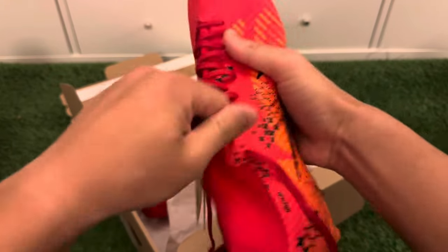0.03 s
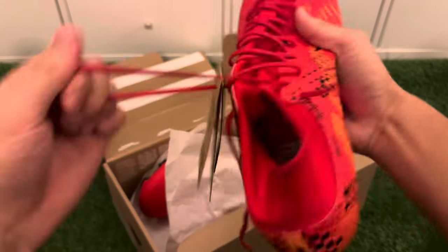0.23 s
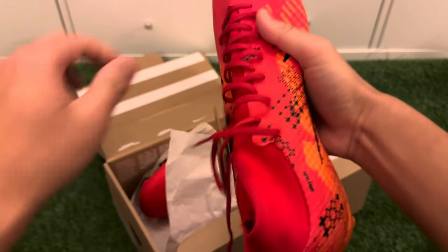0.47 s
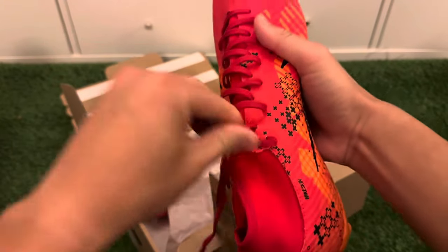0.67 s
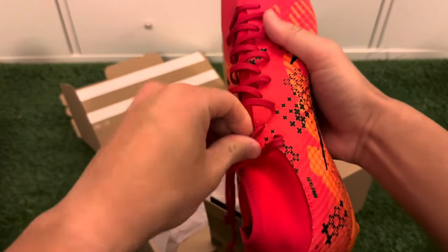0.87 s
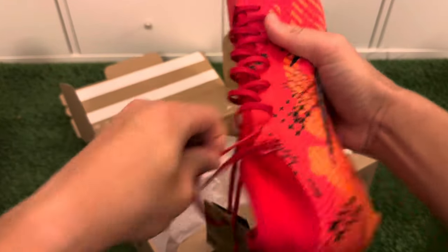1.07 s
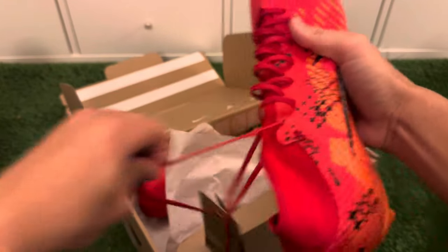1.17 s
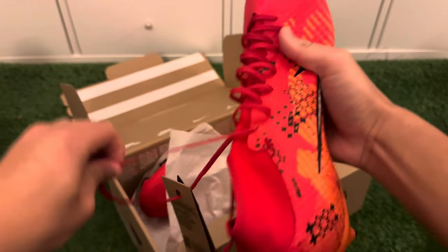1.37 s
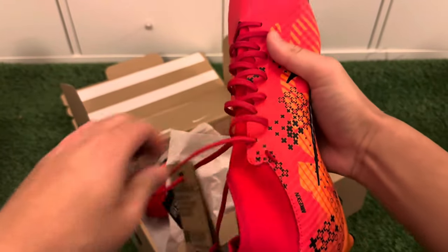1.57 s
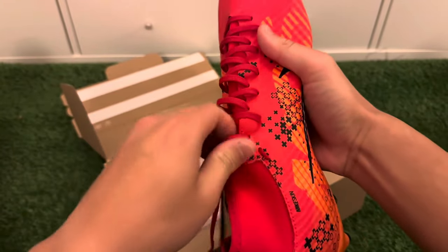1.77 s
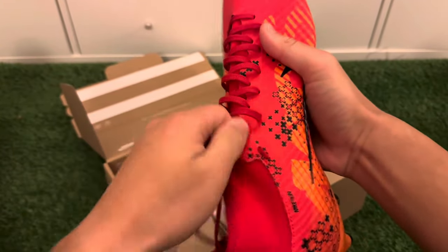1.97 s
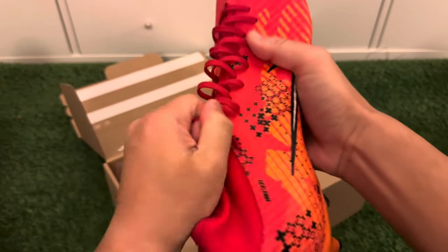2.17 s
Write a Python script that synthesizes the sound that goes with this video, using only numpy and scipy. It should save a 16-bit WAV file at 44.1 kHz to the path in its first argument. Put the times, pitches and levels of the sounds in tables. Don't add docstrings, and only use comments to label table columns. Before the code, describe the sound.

Laces zip through a football boot's eyelets. A sharp tip tick at 0.02 s leads into a fast, rising ribbed zip from 0.07 to 0.2 s, ending in a hollow thump. Small ticks, creaks and thumps follow, clearer near 0.62 s. A second, lower zip runs 1.01 to 1.19 s, with the loudest snap at 1.14. Then softer knocks, creaks and rustle, notably 1.25, 1.7-1.9 and 2.1 s. Close phone, quiet room.

```python
import sys
import numpy as np
from scipy import signal
from scipy.fft import rfft, irfft, next_fast_len
from scipy.io import wavfile

SR = 44100
rng = np.random.default_rng(int(sys.argv[2]) if len(sys.argv) > 2 else 0)


def gain_from_decibels(decibels):
    exponent = np.asarray(decibels, float) / 20
    return 10 ** exponent


def store_wav(level_fs):
    pcm = np.round(np.clip(np.atleast_2d(level_fs), -1, 1) * 32767)
    wavfile.write(sys.argv[1], SR, pcm.T.astype(np.int16))


N = 97152

# pitch_hz, width_hz, level_db
BOOT_LOW = [(97, 29.4, -1.5), (204.3, 78, -0.5), (304.3, 88, 0.5), (512, 167, -6.5)]
# pitch_hz, width_hz, level_db
BOOT_HIGH = [(720, 301, -9.5), (1000, 131, -5), (1190, 244, -12), (1556, 195, -9.5), (2010, 254, -12),
             (2650, 625, -18), (3740, 1300, -25.5), (4300, 200, -23.5), (4795, 680, -34)]


def curve(rows, off=None):
    s, *columns = np.transpose(rows)
    return [np.interp(np.arange(N) / SR, s, column, off, off) for column in columns]


def at_hz(points, hz):
    p = np.array(points)
    return np.interp(np.log(hz + 1), np.log(p[:, 0]), p[:, 1])


def unit(x):
    return x / np.sqrt(np.mean(x ** 2) + 1e-20)


def colour(x, points):
    return irfft(rfft(x) * gain_from_decibels(at_hz(points, np.fft.rfftfreq(N, 1 / SR))), N)


def drift(rate_hz):
    r = np.exp(-2 * np.pi * rate_hz / SR)
    wander = signal.lfilter([1], [1, -2 * r, r * r], rng.standard_normal(N + SR))
    return unit(wander[SR:])


def body(x, peaks):
    out = 0
    for k, (hz, width_hz, db) in enumerate(peaks):
        r = np.exp(-np.pi * width_hz / SR)
        push = np.array([1, 0, -1]) * (1 - r * r) / 2
        ring = [1, -2 * r * np.cos(2 * np.pi * hz / SR), r * r]
        out = out + (-1) ** k * gain_from_decibels(db) * signal.lfilter(push, ring, x + 1e-18)
    return out


def grains(per_s, spread_db):
    hits = rng.random(N) < per_s / SR
    size = gain_from_decibels(spread_db * np.minimum(rng.exponential(1, N), 4))
    return hits * size * rng.choice([-1, 1], N)


def pulls():
    # start_s, ribs_per_s_hz, level_db, hiss_db, octave_db
    pull_tables = [
        [(.074, 265.8, -49, -63, -12), (.084, 301, -49.5, -61.5, -6), (.108, 579.7, -40, -56, -7),
         (.117, 720, -40, -50, 5), (.128, 747, -41.5, -55, 9.5), (.137, 1000, -38.5, -49, -8),
         (.165, 1357, -40.5, -48.5, 2), (.185, 896, -37, -52.5, -16), (.215, 560, -57, -62, -22)],
        [(1.008, 254.5, -57, -78, -11), (1.03, 330.3, -50, -64, 12.5), (1.05, 528.7, -42.5, -55, -18),
         (1.085, 477.8, -42, -59, -10), (1.102, 527, -39.5, -57, -0.5), (1.12, 562.6, -38.5, -54.5, -18),
         (1.138, 622, -44, -57, -17), (1.166, 649, -41, -58, -18), (1.19, 453, -65, -87, -23)],
    ]
    # pitch_hz, level_db (per Hz)
    zip_colour = [(2000, -11), (5000, -13.5), (7000, -10.5), (8500, -4.5), (10000, -2), (12500, -2),
                  (15000, -7.5)]
    rib_jitter, rib_uneven_db = 0.04, 5
    out, wobble, uneven = np.zeros(N), drift(120), rng.standard_normal(N)
    friction_peaks = [(284, 79, -3), (517, 105, -4.5)] + BOOT_HIGH
    friction = unit(body(grains(6000, 0.37), friction_peaks))
    hiss = unit(colour(rng.standard_normal(N), zip_colour)) * gain_from_decibels(drift(58))
    for rows in pull_tables:
        hz = curve(rows)[0]
        level_db, hiss_db, octave_db = curve(rows, -150)[1:]
        turns = np.cumsum(hz * (1 + rib_jitter * wobble)) / SR
        clicks = np.diff(np.floor(turns), prepend=0) * gain_from_decibels(rib_uneven_db * uneven) * np.sqrt(SR / hz)
        buzz = unit(body(clicks, BOOT_HIGH))
        tone = gain_from_decibels(1.5 + 3.3 * drift(86)) * np.sin(2 * np.pi * turns)
        octave = gain_from_decibels(-2 + octave_db + 2.8 * drift(51)) * np.sin(4 * np.pi * turns)
        out += gain_from_decibels(level_db) * (gain_from_decibels(-17) * buzz + tone + octave + gain_from_decibels(1.5) * friction)
        out += gain_from_decibels(hiss_db + 6.5) * hiss
    return out


def snaps():
    # start_s, peak_db, centre_hz
    snap_events = [
        (0.02, -31.5, 4630),
        (.025, -38.5, 4500),
        (0.4142, -41.5, 4500),
        (.4365, -42, 5000),
        (0.621, -35, 4000),
        (1.1444, -16.5, 2700),
        (1.2537, -54.5, 2500),
        (1.912, -38, 4470),
    ]
    fade_s, half_width_octaves = 0.005, 0.9
    out, t = np.zeros(N + SR), np.arange(1024) / SR
    for s, db, hz in snap_events:
        edges_hz = [hz / 2 ** half_width_octaves, hz * 2 ** half_width_octaves]
        band = signal.butter(1, edges_hz, "band", fs=SR, output="sos")
        burst = (rng.standard_normal(1024) + 2.43 * (t == 0)) * gain_from_decibels(-60 * t / fade_s)
        one = signal.sosfilt(band, burst)
        i = int(s * SR)
        out[i:i + 1024] += gain_from_decibels(db) * one / np.abs(one).max()
    return out[:N]


def ticks():
    # start_s, peak_db, sizzle_db, ring_hz
    tick_events = [(0.0212, -25, -46, 2260), (0.283, -67, 18, 5000), (0.384, -60, 17, 5040),
                   (0.496, -48, -4, 2800), (0.416, -44.5, -23, 4070), (0.4364, -36, -8, 5140),
                   (0.453, -45.5, 6.5, 6500), (0.6208, -32.5, -7, 2140), (0.638, -51, 15.5, 5500),
                   (0.744, -57, 7, 5500), (0.789, -48.5, 3, 1970), (0.796, -66, 6, 2500),
                   (.858, -62, 7, 5000), (0.918, -72, 7, 4940), (0.939, -52, 6.5, 5800),
                   (.945, -47.5, -20, 3950), (1.1441, -21.5, -26, 1820), (1.254, -47, -2.5, 4030),
                   (1.312, -57.5, 13, 3120), (1.503, -60, 7, 3900), (1.7095, -54.5, 7, 3180),
                   (1.748, -43, -14, 2830), (1.853, -49, -5, 3960), (1.9123, -36, 1.5, 4570),
                   (2.1263, -54, 12.5, 3330)]
    crack_fade_s, sizzle_fade_s = 0.012, 0.055
    ring_db, ring_cycles, rise_s = -1, 9.8, 0.00049
    out, t = np.zeros((2, N + SR)), np.arange(2048) / SR
    top = signal.butter(2, 6500, "high", fs=SR, output="sos")
    for s, db, sizzle_db, hz in tick_events:
        shared, fizz, left, right = rng.standard_normal((4, 2048))
        hit = shared + 1.9 * (t == 0) + 0.62 * np.array([left, right])
        hit = hit * gain_from_decibels(-60 * t / crack_fade_s)
        ring = np.sin(2 * np.pi * hz * t) * (1 - np.exp(-hz * t)) * gain_from_decibels(-60 * hz * t / ring_cycles)
        crack = unit(body(hit, BOOT_HIGH) + gain_from_decibels(-42) * hit) + gain_from_decibels(ring_db) * unit(ring)
        sizzle = signal.sosfilt(top, fizz * gain_from_decibels(-60 * t / sizzle_fade_s))
        one = crack / np.abs(crack).max() + gain_from_decibels(sizzle_db) * sizzle
        i = int(s * SR)
        out[:, i:i + 2048] += gain_from_decibels(db) * one * (1 - np.exp(-t / rise_s))
    return out[:, :N]


def thumps():
    # start_s, peak_db, pitch_hz
    thump_events = [(0.081, -30, 271), (0.18, -22.5, 335), (0.188, -28, 130), (0.193, -43, 59),
                    (0.275, -35, 243), (0.448, -40, 215), (0.479, -49.5, 63), (.644, -33, 284),
                    (.659, -28, 286), (0.694, -36.5, 250), (1.017, -34.5, 270), (1.02, -48, 102),
                    (1.168, -21, 287.5), (1.172, -36, 133), (1.255, -40, 277), (1.802, -34, 268),
                    (1.832, -44.5, 97), (2.087, -35.5, 212), (2.141, -38, 188)]
    fall_cycles, rise_cycles, sag = 2.4, 0.6, 0.021
    out, t = np.zeros(N + SR), np.arange(8192) / SR
    for s, db, hz in thump_events:
        turns = hz * t
        shape = (1 - np.exp(-turns / rise_cycles)) * np.exp(-(turns / fall_cycles) ** 1.7)
        i = int(s * SR)
        out[i:i + 8192] += gain_from_decibels(db) * shape * np.sin(2 * np.pi * turns / (1 + sag * turns))
    return out[:N]


def knocks():
    # start_s, peak_db, ring_hz
    knock_events = [(.0215, -32.5, 996), (.0757, -35.5, 664), (.621, -42, 1156), (.638, -51, 1970),
                    (.6659, -38, 2350), (.6898, -42.5, 2070), (1.0115, -35.5, 671), (1.029, -36, 630),
                    (1.167, -30, 720), (1.2525, -33.5, 936), (1.282, -37.5, 993), (1.7117, -40, 2074),
                    (1.7459, -37.5, 2160), (1.797, -42, 2150), (1.9135, -35, 1000), (1.927, -46.5, 2030),
                    (2.0835, -36, 936), (2.1465, -44, 2010)]
    rise_s, fall_s, rattle_db = 0.00031, 0.005, 1.5
    out, t = np.zeros(N + SR), np.arange(2048) / SR
    soft = signal.butter(4, 3000, fs=SR, output="sos")
    shape = (1 - np.exp(-t / rise_s)) * np.exp(-t / fall_s)
    for s, db, hz in knock_events:
        ring = unit(shape * np.sin(2 * np.pi * hz * t))
        rattle = unit(signal.sosfilt(soft, body(rng.standard_normal(2048) * shape, BOOT_HIGH)))
        one = ring + gain_from_decibels(rattle_db) * rattle
        i = int(s * SR)
        out[i:i + 2048] += gain_from_decibels(db) * one / np.abs(one).max()
    return out[:N]


def creaks():
    # start_s, length_s, level_db, brightness_db
    creak_events = [(0.039, 0.076, -56.5, 7.5), (0.198, 0.063, -45, -4), (0.271, 0.11, -48.5, -43),
                    (0.443, 0.031, -40.5, -8.5), (0.62, 0.019, -49.5, 9.5), (0.638, 0.092, -43, -4.5),
                    (0.797, 0.081, -55, -5.5), (1.007, 0.081, -42, -13.5), (1.247, 0.025, -40, 3),
                    (1.281, 0.043, -46, 1), (1.41, 0.046, -73.5, 4), (1.509, 0.018, -66, 3),
                    (1.635, 0.054, -76.5, 14), (1.706, 0.027, -46.5, -1), (1.741, 0.087, -50.5, 1.5),
                    (1.801, 0.054, -49.5, -18), (1.919, 0.057, -54, 5.5), (2.082, 0.03, -44.5, -13),
                    (2.122, 0.056, -44, -3.5)]
    attack_s, sag_db, tail_s, slips_per_s = 0.004, 10.5, 0.015, 2500
    t, low, high = np.arange(N) / SR, np.zeros(N), np.zeros(N)
    for s, length_s, db, bright_db in creak_events:
        age = t - s
        hold_db = db - sag_db * np.clip(age / length_s, 0, 1)
        tail_db = -20 * np.maximum(age - length_s, 0) / tail_s
        shape = np.clip(age / attack_s, 0, 1) * gain_from_decibels(hold_db + tail_db)
        low += shape
        high += shape * gain_from_decibels(bright_db)
    deep = body(low * unit(grains(slips_per_s, 3.26)), BOOT_LOW)
    bright = body(high * unit(grains(slips_per_s, 3.2)), BOOT_HIGH)
    return deep * gain_from_decibels(20.5) + bright * gain_from_decibels(19)


def hands():
    # start_s, grip_db, slide_db
    touches = [(0, -59.5, -72), (.24, -58, -70.5), (.37, -65, -66), (.41, -56.5, -69.5), (.54, -64.5, -59),
               (.64, -77, -56.5), (.73, -63, -72.5), (.86, -60.5, -69), (.98, -64.5, -69.5),
               (1.2, -55, -74.5), (1.32, -55, -65), (1.45, -73, -89), (1.52, -66, -77.5),
               (1.61, -77, -89.5), (1.72, -64.5, -65.5), (1.83, -57, -63), (2.02, -60.5, -70.5),
               (2.2, -52, -71)]
    # pitch_hz, level_db (per Hz)
    slide_colour = [(2000, -18.5), (5000, -13), (7000, -10), (8500, -1), (10000, -5), (12000, -7.5),
                    (15000, -14)]
    grip_db, slide_db = curve(touches)
    touch = grains(2500, 1.8)
    rustle = unit(body(touch, BOOT_LOW[:3]) + gain_from_decibels(-4.5) * body(touch[::-1], BOOT_HIGH))
    slide = unit(colour(rng.standard_normal(N), slide_colour))
    return gain_from_decibels(grip_db + 2.84 * drift(64)) * rustle + gain_from_decibels(slide_db + 6.5 + 2 * drift(23)) * slide


def ports(pair):
    # pitch_hz, lead_turns (cycles)
    port_turns = [(1000, 0.045), (5800, 0.25), (8000, 0.42), (9500, 0.5), (11000, 0.6), (12500, 0.74),
                  (16000, .95)]
    # pitch_hz, share (0 to 1)
    scattered_share = [(60, .15), (300, 0.2), (1000, 0.2), (3000, 0.3), (5500, 0.55), (8000, 0.25),
                       (10500, 0.2), (14000, 0.3)]
    echo_db, echo_fade_s, scatter_fade_s, scatter_from_hz = 2.5, 0.22, 0.008, 300
    size = next_fast_len(N + SR)
    hz, t = np.fft.rfftfreq(size, 1 / SR), np.arange(SR // 2) / SR
    share = np.clip(at_hz(scattered_share, hz), 0, 0.95)

    def noise_path(fade_s):
        tail = rng.standard_normal((2, len(t))) * gain_from_decibels(-60 * t / fade_s)
        return rfft(tail / np.sqrt(np.sum(tail ** 2, axis=1, keepdims=True)), size)

    lag = np.exp(1j * np.pi * at_hz(port_turns, hz) * np.array([[1], [-1]]))
    direct = np.sqrt(1 - share ** 2) * lag
    scatter = share * hz / (hz + scatter_from_hz) * noise_path(scatter_fade_s)
    echo = gain_from_decibels(echo_db) * share * noise_path(echo_fade_s)
    return irfft(rfft(pair, size) * (direct + scatter + echo), size)[:, :N]


def room():
    # pitch_hz, level_db (per Hz)
    room_colour = [(25, 6.5), (110, 18.5), (300, -35), (700, -71), (1000, -24), (2100, -18.5), (5000, -12),
                   (16000, -10.5)]
    shared = unit(colour(rng.standard_normal(N), room_colour))
    own = unit(colour(rng.standard_normal((2, N)), room_colour))
    return gain_from_decibels(-72) * (ports(shared * np.ones((2, 1))) + 0.1 * own)


def scene():
    side = np.array([[0.5], [-0.5]])
    # sound, and how many dB louder it is on the left
    groups = [(pulls(), -2.5), (ticks() + knocks() + snaps(), 1.0),
              (creaks() + thumps(), -0.7), (hands(), 1.5)]
    return sum(ports(x * gain_from_decibels(side * left_db)) for x, left_db in groups) + room()


def roll_off(x):
    return signal.sosfilt(signal.butter(12, 16460, fs=SR, output="sos"), x)


def record(dry):
    top_cut = signal.cheby2(16, 70, 16300, fs=SR, output="sos")
    mix = signal.sosfilt(top_cut, dry)
    return roll_off(mix)


dry = scene()
out = record(dry)
store_wav(out)
```